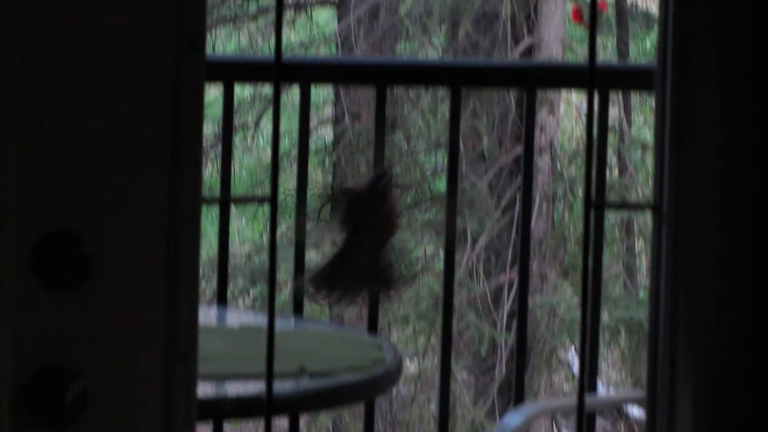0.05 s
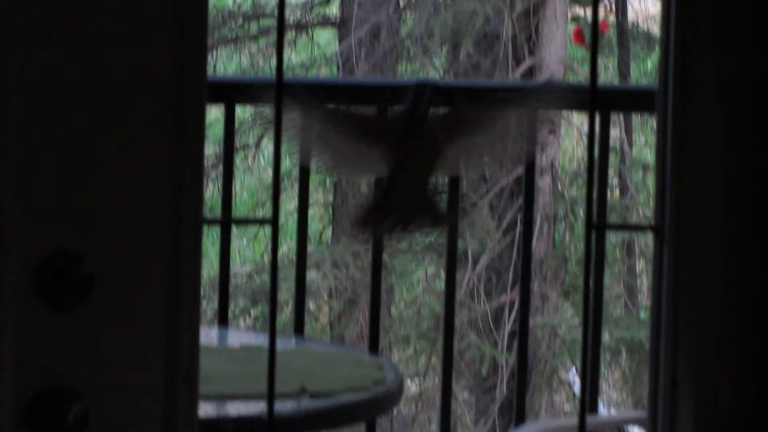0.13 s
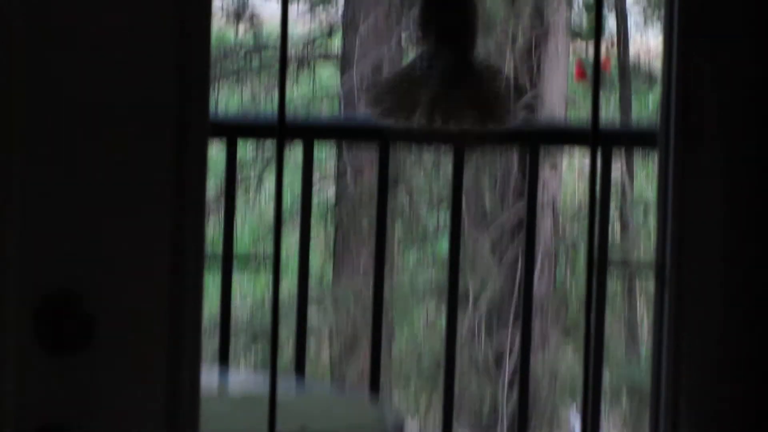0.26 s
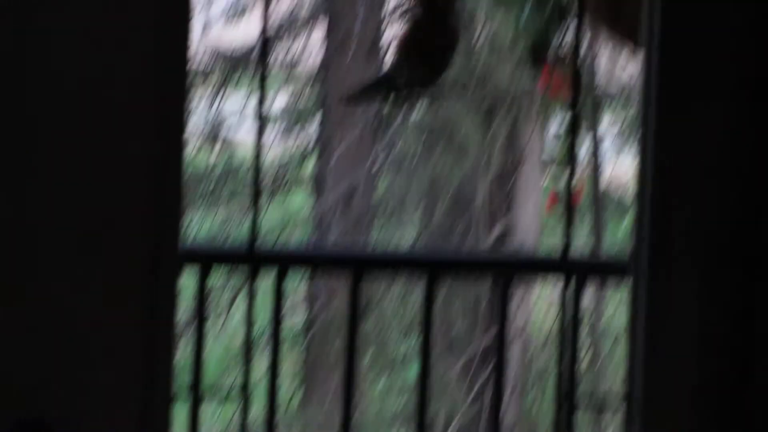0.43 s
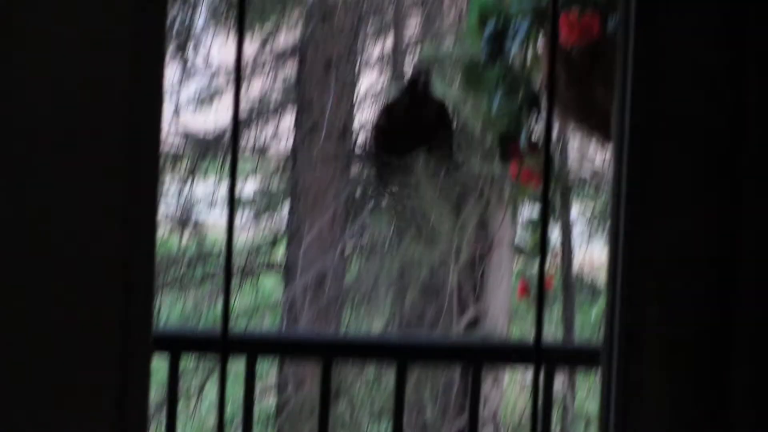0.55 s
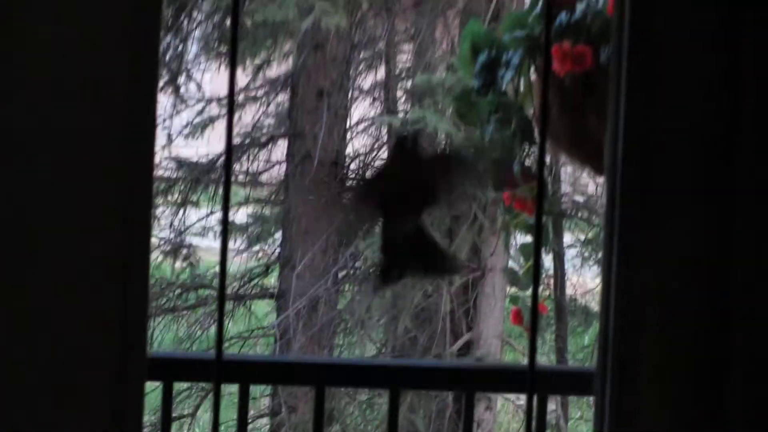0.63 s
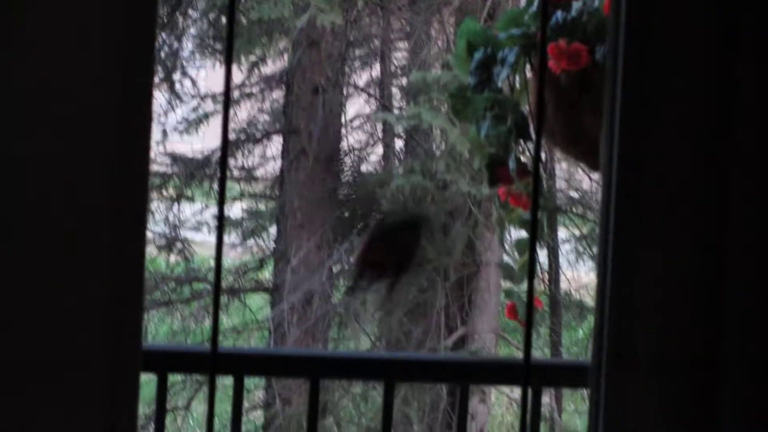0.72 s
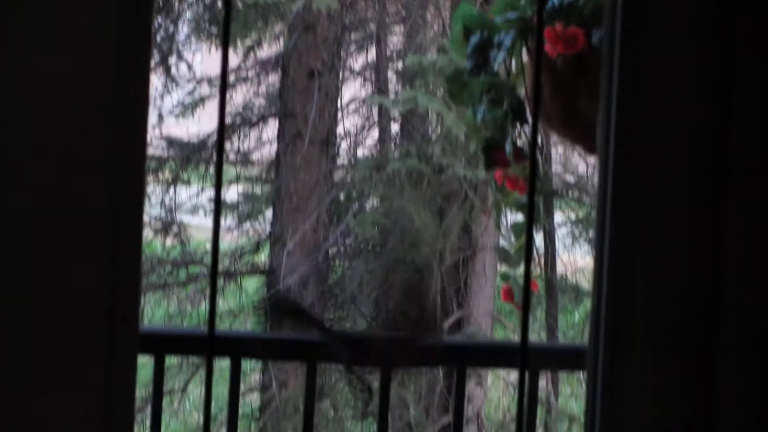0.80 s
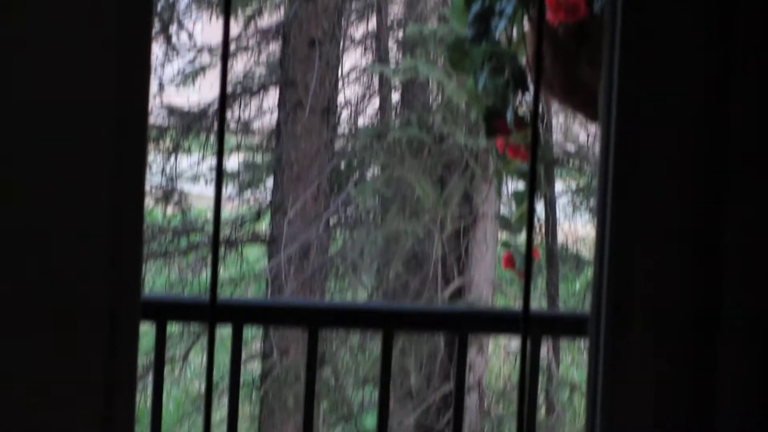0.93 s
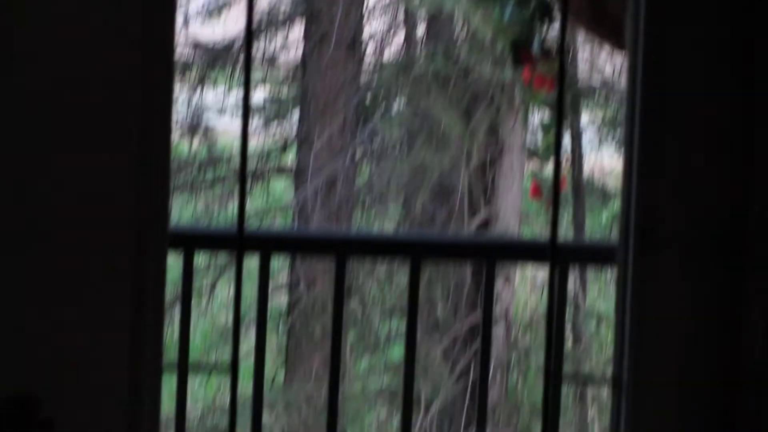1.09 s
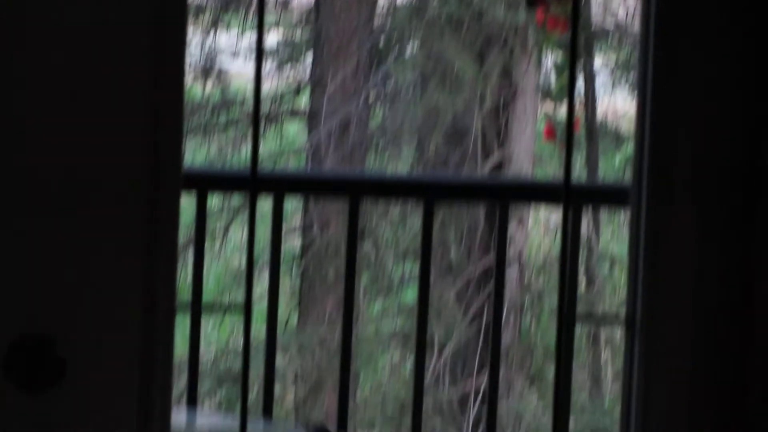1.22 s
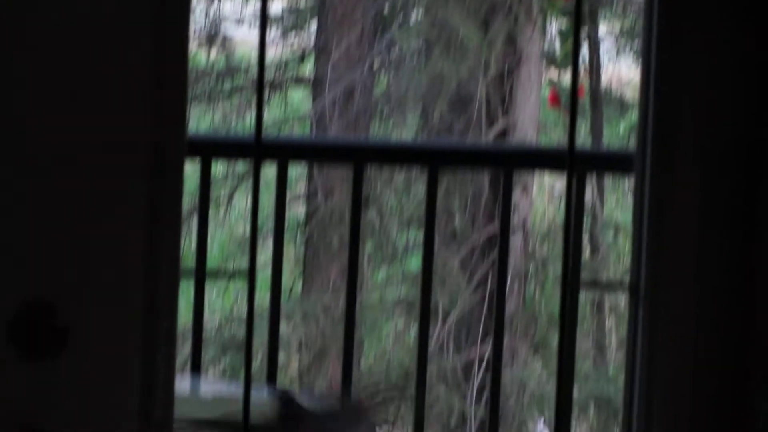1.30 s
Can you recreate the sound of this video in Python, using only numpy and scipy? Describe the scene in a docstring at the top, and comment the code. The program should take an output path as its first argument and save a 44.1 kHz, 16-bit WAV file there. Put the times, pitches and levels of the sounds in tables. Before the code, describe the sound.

Dull thump of a bird hitting a window, with wing ticks, claw clacks and a softer knock.

```python
"""Bird against a window

Heard from inside a quiet room, a bird's body thumps the pane, which rings low.
Wing tips tick and claws clack on the glass, a wing brushes the frame, then comes a softer knock.
The room answers each blow over a low steady background; faint peeps come from outside."""
import sys
import numpy as np
from scipy import signal
from scipy.fft import rfft, irfft, next_fast_len
from scipy.io import wavfile
from scipy.ndimage import map_coordinates

SR = 44100
rng = np.random.default_rng(int(sys.argv[2]) if len(sys.argv) > 2 else 0)


def digitize_waveform(pressure):
    """Quantize a signal to 16-bit integers and store it at the path in sys.argv[1].

    Rows of a 2-D input are taken as channels; values are limited to [-1, 1].
    """
    field = np.atleast_2d(pressure).T
    bounded = np.clip(field, -1, 1)
    quanta = np.round(bounded * 32767).astype(np.int16)
    wavfile.write(sys.argv[1], SR, quanta)


N = 59535
TIME_S = np.arange(N) / SR


def amp(db):
    """Decibels to gain."""
    return 10 ** (np.asarray(db) / 20)


def along(points, hz):
    """Read a curve of (hz, value) points on a log frequency axis."""
    point_hz, values = np.transpose(points)
    return np.interp(np.log(hz + 1), np.log(np.sort(point_hz) + 1), values)


def since(start_s):
    """Seconds since start_s, zero before it."""
    return np.maximum(TIME_S - start_s, 0)


def fade(t, t60_s):
    """Exponential decay by 60 dB in t60_s."""
    return np.exp(-np.log(1000) * t / t60_s)


def pan(x, right_db):
    """Make the right channel right_db louder than the left."""
    return x * amp(np.array([[-right_db], [right_db]]) / 2)


def noise(spectrum, correlation):
    """Coloured stereo noise of rms 1 that rolls off beyond the ends of its spectrum."""
    hz = np.fft.rfftfreq(N, 1 / SR)
    width = np.arccos(np.clip(along(correlation, hz), -.99, .99)) / 2
    skirts = (np.minimum(hz / spectrum[0][0], 1) / np.maximum(hz / spectrum[-1][0], 1)) ** 4
    colour = amp(along(spectrum, hz)) * skirts
    white = rfft(rng.standard_normal((2, N)))
    mid, side = irfft(white * colour * [np.cos(width), np.sin(width)], N)
    pair = np.array([mid + side, mid - side])
    return pair / pair.std()


def decay_bands(x, start_s, t60_at):
    """From start_s on, each frequency of x fades at its own speed."""
    hz, frame_s, bands = signal.stft(x, SR, nperseg=128)
    decay = fade(np.maximum(frame_s - start_s, 0), t60_at(hz)[:, None])
    return signal.istft(bands * decay, SR, nperseg=128)[1][:, :N]


# Stereo image of the hits: freq_hz, left_right_correlation
HIT_CORRELATION = [(70, 0.4), (150, 1), (300, 0.77), (600, 0.84), (1500, 0.57), (5000, 0.21), (12000, 0.44)]
# Reverb time of the room: freq_hz, t60_s
ROOM_DECAY = [(150, 1), (500, 0.53), (1500, 0.5), (4000, 0.64), (8000, 0.16), (14000, 0.11)]
DAMPING_HZ = 7840  # here a contact dies twice as fast as in the bass


def burst(start_s, spectrum, attack_s, t60_s, room_db):
    """A contact's dense vibration, which darkens as it dies, and the room's answer."""
    direct = decay_bands(noise(spectrum, HIT_CORRELATION), start_s,
                         lambda hz: t60_s / (1 + (hz / DAMPING_HZ) ** 2))
    tail = decay_bands(noise(spectrum, HIT_CORRELATION), start_s, lambda hz: along(ROOM_DECAY, hz))
    attack = 1 - np.exp(-since(start_s) / attack_s)
    return attack * (direct + amp(room_db) * tail)


def ring(start_s, modes, waver_rad):
    """Modes that swell and decay; their phases waver and differ a little between the ears."""
    t, out = since(start_s), np.zeros((2, N))
    for hz, db, t60_s, rise_s in modes:
        drift = map_coordinates(rng.standard_normal(64), [t * 25], mode="wrap")  # 25 points a second
        spread = np.arccos(np.clip(along(HIT_CORRELATION, hz), -1, 1)) / 2 * rng.choice([-1, 1])
        phase = 2 * np.pi * (hz * t + rng.random()) + waver_rad * drift
        envelope = (1 - np.exp(-(t / rise_s) ** 2)) * fade(t, t60_s)
        out += amp(db) * envelope * np.sin([phase + spread, phase - spread])
    return out


# Bass-heavy colour of the room tone: freq_hz, gain_db
ROOM_TONE_EQ = [(25, -18), (45, -15.5), (75, -5.5), (110, -3), (178, -2), (215, -6), (331, -5.5),
                (420, -8.5), (614, -13), (804, -14), (1240, -18.5), (2900, -25), (3930, -31.5),
                (5900, -30.5), (8500, -37), (10200, -43.5), (12000, -52), (15500, -54)]
# Its near-flat fader ride: time_s, level_db
ROOM_TONE_RIDE = [(0, -49), (.15, -47.5), (.9, -48.5), (1.35, -48.5)]
# Its wide stereo image: freq_hz, left_right_correlation
ROOM_TONE_CORRELATION = [(40, -0.18), (80, -0.4), (150, -0.21), (400, -0.32), (1000, 0.032), (3000, 0.14),
                         (10000, 0.016)]


def room_tone():
    """The low steady rush of the room."""
    level_db = np.interp(TIME_S, *np.transpose(ROOM_TONE_RIDE))
    return pan(amp(level_db) * noise(ROOM_TONE_EQ, ROOM_TONE_CORRELATION), right_db=0.54)


# Wing tips touching the glass: start_s, level_db
TICKS = [(0.203, -42.5), (0.2346, -53), (0.2544, -50.5), (0.2937, -51), (.3135, -51.5), (.3866, -48),
         (0.595, -54.5), (.6368, -50.5), (0.7213, -56.5)]
# Bright, thin colour of a tick: freq_hz, gain_db
TICK_EQ = [(1500, -16), (3500, -1), (6300, 4.5), (9500, 0), (12000, -17), (15500, -12)]


def wing_ticks():
    """Wing tips flick the glass in light, short ticks, a little to the left."""
    ticks = sum(amp(db) * burst(start_s, TICK_EQ, attack_s=0.00063, t60_s=0.061, room_db=-18.5)
                for start_s, db in TICKS)
    return pan(ticks, right_db=-3)


# Crisp slap of feathers: freq_hz, gain_db
SLAP_EQ = [(500, -11), (800, -3.5), (1500, -4), (2800, -11), (4500, -13.5), (7500, -20.5), (10000, -29),
           (12500, -46), (15500, -45)]
# Dull thump of the body: freq_hz, gain_db
THUMP_EQ = [(110, -14), (170, -2), (260, -3.5), (390, -0.5), (500, -17), (640, -0.5), (800, -13.5),
            (1100, -34.5), (1600, -48)]
# Low ring of the pane: pitch_hz, gain_db, t60_s, rise_s
PANE_LOW_MODES = [(69.2, -17, 0.66, 0.049), (138, -5.5, 0.39, 0.013), (169.7, 2.5, 0.13, 0.0038),
                  (203.2, -0.5, 0.65, 0.015), (237.5, -3.5, 0.53, 0.026), (282.2, -1, 0.31, 0.021),
                  (376, -7, .42, 0.012), (403.3, -12, 0.66, 0.015), (467.5, -11.5, 0.29, 0.0071),
                  (530, -20, 0.84, 0.033), (573.3, -13.5, .32, 0.0046), (678, -11, 0.31, 0.0016),
                  (808.5, -15.5, 0.39, 0.0066)]
# Thin, glassy overtones: pitch_hz, level_db, t60_s, rise_s
PANE_HIGH_MODES = [(1065, -40.5, .2, .004), (1243, -41.5, .22, .004), (1440, -41, 0.29, .006),
                   (1572, -43, 0.24, .004), (2160, -37.5, 0.097, .003), (2825, -37, .11, .003),
                   (3740, -48, 0.18, .003)]


def body_strike(start_s):
    """Feathers slap the glass, the body thumps it and the pane rings on."""
    slap = amp(-29.5) * burst(start_s, SLAP_EQ, attack_s=0.0027, t60_s=0.09, room_db=-12)
    thump = amp(-28.5) * burst(start_s, THUMP_EQ, attack_s=0.0018, t60_s=0.24, room_db=-3)
    low_ring = amp(-23.5) * ring(start_s, PANE_LOW_MODES, waver_rad=0.43)
    high_ring = ring(start_s, PANE_HIGH_MODES, waver_rad=0.42)
    return pan(slap, right_db=2.5) + pan(thump + low_ring + high_ring, right_db=1.2)


# A faint rustle, then claws hitting the glass: start_s, level_db
CLACKS = [(0.297, -52), (0.3826, -41.5), (.3955, -46)]
# Hard upper-mid colour of a clack: freq_hz, gain_db
CLACK_EQ = [(700, -9), (1800, -4.5), (2480, -4.5), (2850, -6.5), (3250, 2), (3800, -1), (4400, -9),
            (5050, -1.5), (5900, -10), (8000, -22), (15000, -41)]


def claw_clacks():
    """A faint rustle, then hard claws clack on the pane as the bird flutters against it."""
    clacks = sum(amp(db) * burst(start_s, CLACK_EQ, attack_s=0.0007, t60_s=0.12, room_db=-16.5)
                 for start_s, db in CLACKS)
    return pan(clacks, right_db=1)


# A wing meeting the frame: start_s, level_db
BRUSHES = [(0.471, -48.5)]
# Dark colour of the brush: freq_hz, gain_db
BRUSH_EQ = [(300, 11), (1100, 2.5), (2000, -6), (4000, -11.5), (9000, -39)]


def wing_brush():
    """A wing brushes the frame with a soft-edged puff of noise."""
    return sum(amp(db) * burst(start_s, BRUSH_EQ, attack_s=0.0043, t60_s=0.35, room_db=-16)
               for start_s, db in BRUSHES)


# Muffled thud of the knock: freq_hz, gain_db
KNOCK_EQ = [(110, -11), (200, -0.5), (340, -3.5), (450, -6.5), (680, -12), (1000, -22.5), (1600, -25.5),
            (4000, -30), (8000, -36)]
# Low-mid ring of the knocked pane: pitch_hz, gain_db, t60_s, rise_s
KNOCK_MODES = [(229, -3, 0.72, 0.02), (320.7, 3.5, 0.35, 0.0063), (385, -2.5, 0.4, 0.0028),
               (477, -18, .35, 0.0039), (537, -2.5, 0.33, 0.004), (614, -17, 0.29, 0.0021),
               (666, -3.5, 0.17, 0.0017), (787, -11, 0.12, 0.0012)]


def soft_knock(start_s):
    """A softer blow that leaves out the pane's deepest modes."""
    thud = amp(-43) * burst(start_s, KNOCK_EQ, attack_s=0.0005, t60_s=0.28, room_db=-0.5)
    pane = amp(-39) * ring(start_s, KNOCK_MODES, waver_rad=0.52)
    return pan(thud + pane, right_db=3)


# Bird notes: centre_s, half_length_s, pitch_hz, glide_hz_per_s, warble_hz, level_db
PEEPS = [(.722, 0.049, 2520, -300, 202.5, -62.5), (0.807, 0.023, 3080, 899, 12, -59.5),
         (0.851, 0.06, 2535, -300, 192, -64.5)]


def peeps():
    """Faint gliding, warbling notes of a bird outside, off to the right."""
    notes = np.zeros(N)
    for centre_s, half_length_s, pitch_hz, glide_hz_per_s, warble_hz, db in PEEPS:
        t = TIME_S - centre_s
        wander = map_coordinates(rng.standard_normal(512), [TIME_S * 300], mode="wrap")
        hz = pitch_hz + glide_hz_per_s * t + warble_hz * wander
        swell = np.exp(-(t / half_length_s) ** 2)
        notes += amp(db) * swell * np.sin(2 * np.pi * np.cumsum(hz) / SR)
    return pan(notes, right_db=9)


def scene():
    """The stereo mix, as heard indoors."""
    return (room_tone() + wing_ticks() + body_strike(start_s=0.206) + claw_clacks() + wing_brush()
            + soft_knock(start_s=0.592) + peeps())


def record(dry):
    """A brick-wall low-pass trims the very top of the mix."""
    cutoff_hz = 15800
    size = next_fast_len(N + SR // 2)
    passband = np.fft.rfftfreq(size, 1 / SR) < cutoff_hz
    return irfft(rfft(dry, size) * passband, size)[:, :N]


dry = scene()
out = record(dry)
digitize_waveform(out)
```